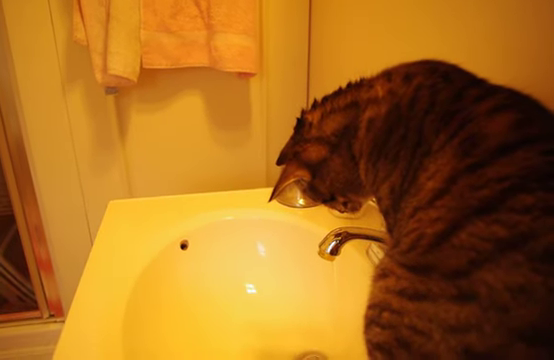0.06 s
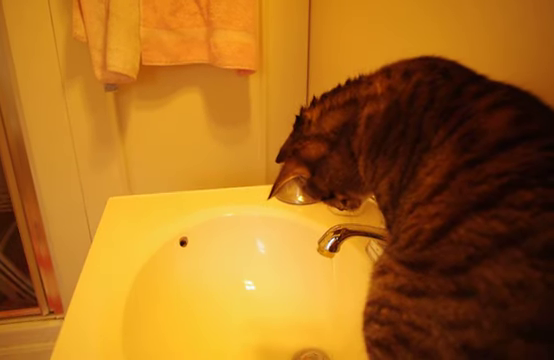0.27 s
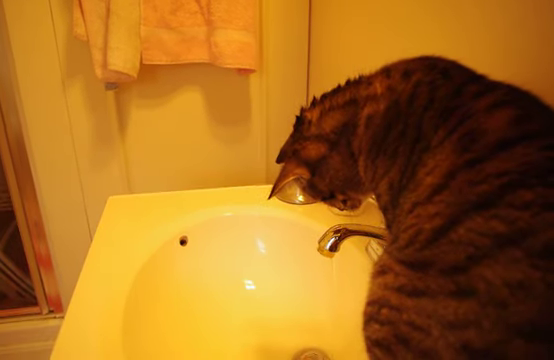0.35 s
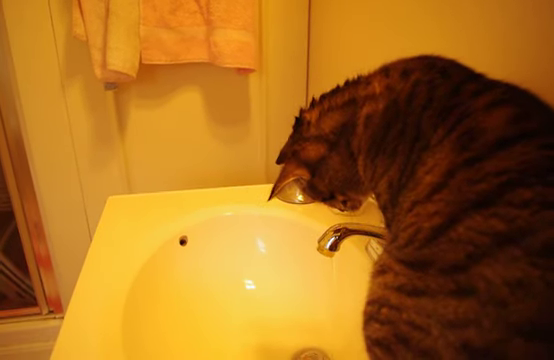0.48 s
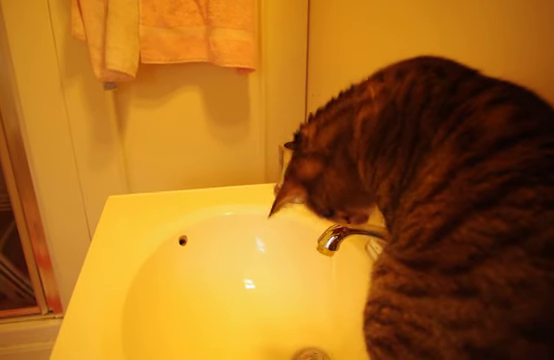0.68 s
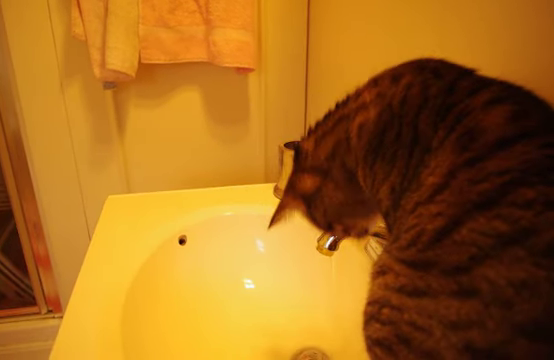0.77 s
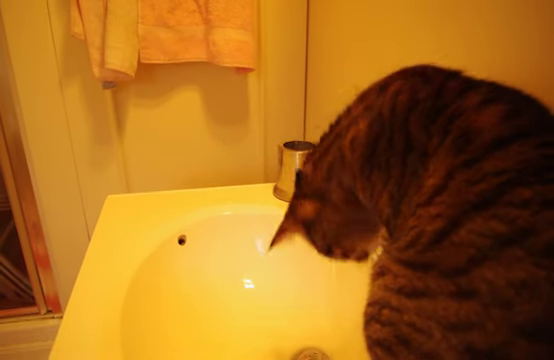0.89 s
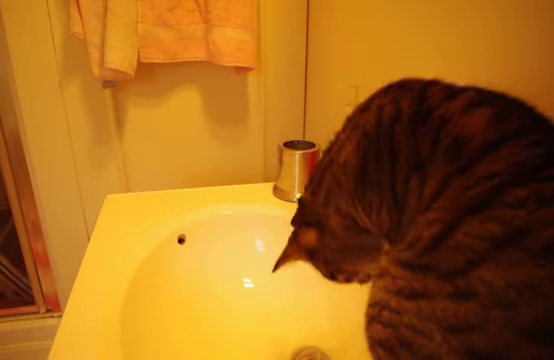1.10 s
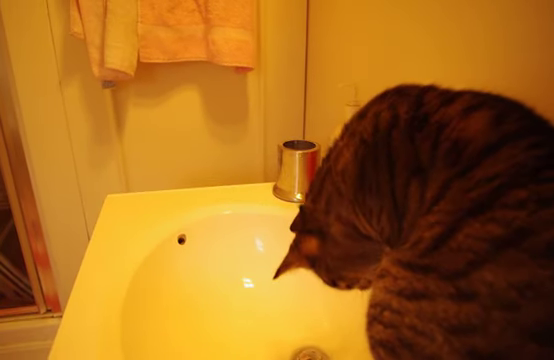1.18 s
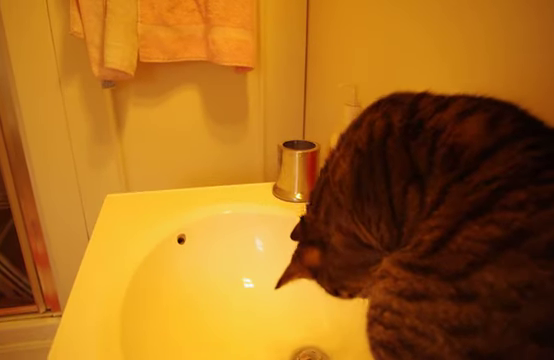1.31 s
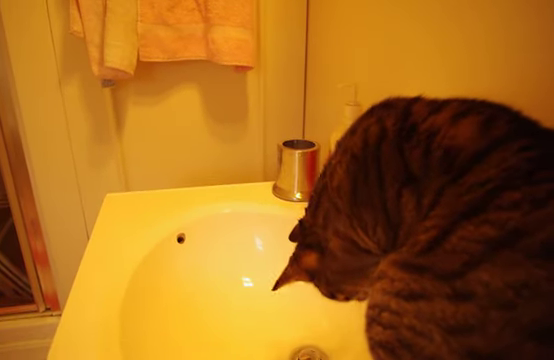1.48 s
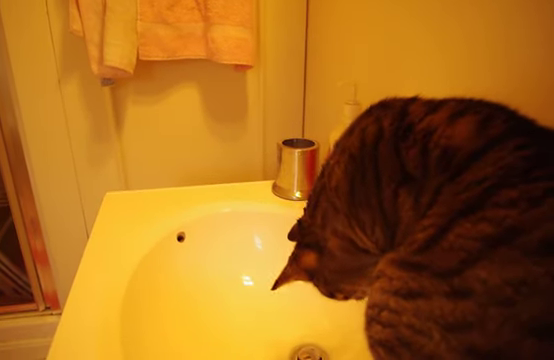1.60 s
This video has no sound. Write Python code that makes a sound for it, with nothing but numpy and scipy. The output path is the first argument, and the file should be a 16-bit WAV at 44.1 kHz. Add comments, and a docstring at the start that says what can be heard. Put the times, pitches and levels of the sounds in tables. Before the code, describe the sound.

Tiny, high water drips tick unevenly in a basin, two clear ones early and weaker ones after. Soft taps lie underneath, and the small bathroom adds a brief echo over steady, faint ventilation hum and hiss.

```python
"""Sharp ticks of water at a dripping tap over a basin, where a cat drinks in a small bathroom.
Each drip is an impulsive snap and a tiny bubble that resonates for about a millisecond;
the basin and hard walls reflect it as early echoes and a short reverberant tail.
A few soft taps lie underneath, with a steady ventilation-like hum and faint hiss."""
import sys
import numpy as np
from scipy import signal
from scipy.fft import rfft, irfft
from scipy.io import wavfile
from scipy.ndimage import uniform_filter1d

SR = 44100
rng = np.random.default_rng(int(sys.argv[2]) if len(sys.argv) > 2 else 0)


def to_wav(s):
    """Save 16-bit WAV."""
    ch = np.atleast_2d(s).T  # columns
    pcm = np.round(np.clip(ch, -1, 1) * 32767)  # PCM
    wavfile.write(sys.argv[1], SR, pcm.astype(np.int16))


N = 72765


def undb(db):
    """Decibels to amplitude gain."""
    return 10 ** (np.asarray(db) / 20)


def level(x, db):
    """Normalisation to an rms level."""
    return x * undb(db) / np.sqrt(np.mean(x ** 2))


def colour(x, points, size=4096):
    """Minimum-phase filtering through (frequency_hz, gain_db) points."""
    hz, db = np.array(points, float).T
    f = np.maximum(np.arange(size // 2 + 1) * SR / size, 1)
    gain = undb(np.interp(np.log(f), np.log(hz), db))
    cepstrum = irfft(np.log(gain))
    cepstrum[1:size // 2] *= 2  # folding makes the filter causal
    cepstrum[size // 2 + 1:] = 0
    return signal.fftconvolve(x, irfft(np.exp(rfft(cepstrum))))[:len(x)]


def resonance(x, hz, width):
    """Two resonators in cascade, for steep skirts."""
    b, a = signal.iirpeak(hz, hz / (1.5 * width), fs=SR)
    return signal.lfilter(b, a, signal.lfilter(b, a, x))


def walk(rate):
    """Interpolated noise: a smooth drift with a spread near 1."""
    k = int(SR / rate)
    return uniform_filter1d(np.repeat(rng.standard_normal(N // k + 1), k), k)[:N]


def add(out, start, sound):
    """Superposition of a short sound at a start time."""
    i = int(start * SR)
    out[i:i + len(sound)] += sound[:N - i]


def drips(size=1024):
    """Bubble resonance: each drip is an impulse, and its bubble rings as a damped oscillator."""
    # Drips, before colouring: start_s, pitch_hz, decay_ms, ring_db, snap_db
    drops = [ (0.1054, 7460, .9, -32.5, -48), (0.2001, 8240, 0.5, -6.5, -22), (0.2858, 5030, 0.43, 0.5, -8),
             (0.2857, 8160, 0.16, -9, -20), (0.5595, 12600, 0.1, -23, -25), (0.576, 8300, 0.19, -24, -16),
             (0.7116, 7450, 0.12, -26.5, -23), (0.7878, 7600, 0.21, -33, -25),
             (0.8558, 8100, .25, -32, -28), (0.8683, 6300, 0.13, -15, -37),
             (1.0581, 8650, 0.42, -14.5, -43), (1.2009, 6540, 0.12, -20, -24),
             (1.3008, 9700, 0.58, -32, -48), (1.343, 12900, 0.13, -15.5, -41),
             (1.3457, 8300, 0.43, -29, -33), (1.4681, 7100, 0.26, -27, -38), ]
    # Colour of every drip: frequency_hz, gain_db
    drip_colour = [(300, -35), (2500, -15), (4500, -3.5), (6500, -0.5), (8700, 1), (10500, -3),
                   (12500, -11), (14000, -14), (15500, -36)]
    attack_s = .00004
    out, t = np.zeros(N), np.arange(size) / SR
    for start_s, pitch_hz, decay_ms, ring_db, snap_db in drops:
        envelope = (1 - np.exp(-t / attack_s)) * np.exp(-1000 * t / decay_ms)
        tick = undb(ring_db) * envelope * np.cos(2 * np.pi * pitch_hz * t)
        tick[0] += undb(snap_db)
        add(out, start_s, tick)
    return colour(out, drip_colour)


def taps(size=1024):
    """Damped free vibration: each soft contact at the basin excites one short-lived mode."""
    # Contacts, before the bass cut: start_s, pitch_hz, level_db
    contacts = [(.2857, 1700, -36.5), (.3295, 2400, -35.5), (.3325, 910, -36), (.996, 1070, -36.5),
                (1.124, 1050, -35.5), (1.136, 657, -35), (1.252, 880, -49), (1.383, 1100, -41.5)]
    decay_s, bass_cut_hz = 0.0011, 300
    out, t = np.zeros(N), np.arange(size) / SR
    for start_s, pitch_hz, level_db in contacts:
        envelope = undb(level_db) * np.exp(-t / decay_s)
        add(out, start_s, envelope * np.sin(2 * np.pi * pitch_hz * t))
    return signal.sosfilt(signal.butter(2, bass_cut_hz, "high", fs=SR, output="sos"), out)


def bathroom(x):
    """Reverberation: convolution with the direct sound, early reflections and a diffuse tail."""
    # Reflections from basin and walls, before colouring: delay_ms, gain_db
    reflections = [(1.7, -8.5), (4.7, -6), (10.1, -7.5), (11.0, -9), (12.8, -8), (19.1, -23), (21.8, -25),
                   (25.6, -15), (28.7, -23), (32.6, -14)]
    # Colour of the reflections: frequency_hz, gain_db
    echo_colour = [(1000, -2), (4000, -7.5), (6000, -4.5), (8500, 0.5), (10500, 0.5), (14500, -3)]
    # Colour of the tail: frequency_hz, gain_db
    tail_colour = [(500, -6), (3000, -1), (5200, -1), (7500, -2), (9500, 2.5), (14000, -2)]
    tail_db, t60_s, build_s = -0.5, .26, 0.0044
    scatter_db, scatter_s = -7, 0.00039
    t = np.arange(N // 2) / SR
    envelope = (1 - np.exp(-t / build_s)) * np.exp(-np.log(1000) * t / t60_s)
    tail = rng.standard_normal(len(t)) * envelope
    response = colour(undb(tail_db) * tail / np.linalg.norm(tail), tail_colour)
    response[0] += 1  # direct sound
    early = np.zeros(N)
    for delay_ms, gain_db in reflections:
        # Curved surfaces scatter each reflection slightly.
        scatter = rng.standard_normal(len(t)) * np.exp(-t / scatter_s)
        echo = undb(scatter_db) * scatter / np.linalg.norm(scatter)
        echo[0] += 1  # specular part
        add(early, delay_ms / 1000, undb(gain_db) * echo)
    response += colour(early[:len(t)], echo_colour)
    return signal.fftconvolve(x, response)[:N]


def ventilation():
    """Duct resonance: broadband noise of moving air, with narrow bands that waver in level."""
    # Spectrum of the moving air: frequency_hz, relative_db
    air_spectrum = [(25, -40), (60, -27), (100, -10), (125, -3), (200, -4), (310, 2), (500, -0.5), (800, 2),
                    (950, -7), (1300, -4.5), (1500, -9.5), (2000, -10), (3000, -14), (6000, -21),
                    (15000, -37)]
    # Duct resonances: centre_hz, width_hz, rms_db
    duct_modes = [(409, 69, -59.5), (614.8, 29.7, -56.5), (661, 64, -59.5), (813, 64, -67),
                  (1220, 147, -62), (2310, 66, -64.5), (2577, 112, -60), (3527, 530, -61.5),
                  (4515, 250, -65)]
    waver_db, waver_hz = 1.36, 9.42
    out = level(colour(rng.standard_normal(N), air_spectrum), db=-52)
    for centre_hz, width_hz, rms_db in duct_modes:
        band = resonance(rng.standard_normal(N), centre_hz, width_hz)
        out += level(band * undb(waver_db * walk(waver_hz)), rms_db)
    return out


def hiss():
    """Stationary filtered noise: a faint, even treble hiss."""
    # Spectrum of the hiss: frequency_hz, relative_db
    hiss_spectrum = [(1000, -14.5), (4000, -10), (5500, -3), (7500, -4), (8500, 2.5), (9500, -1.5),
                     (10700, -10), (12500, -18.5), (15000, -34)]
    return level(colour(rng.standard_normal(N), hiss_spectrum), db=-55.5)


def scene():
    """Superposition: drips and taps reverberate in the room, over the steady background."""
    return (bathroom(drips() + taps()) + ventilation() + hiss())[None]


def record(dry):
    """Band limiting: a steep low-pass filter removes the top of the treble."""
    cutoff_hz = 15100
    return signal.sosfilt(signal.ellip(8, .2, 70, cutoff_hz, fs=SR, output="sos"), dry)


dry = scene()
out = record(dry)
to_wav(out)
```